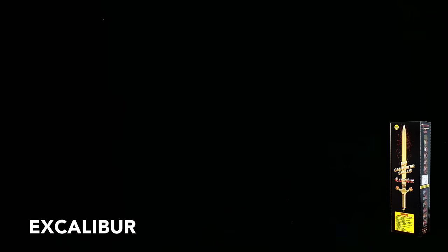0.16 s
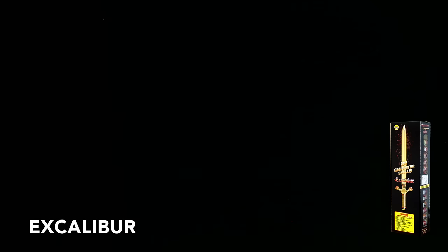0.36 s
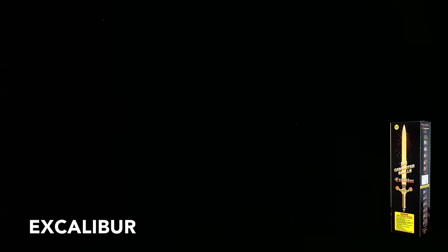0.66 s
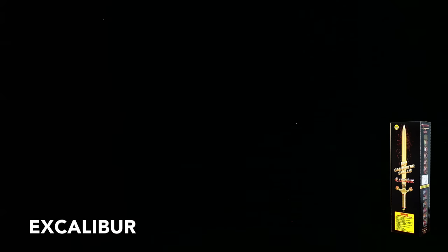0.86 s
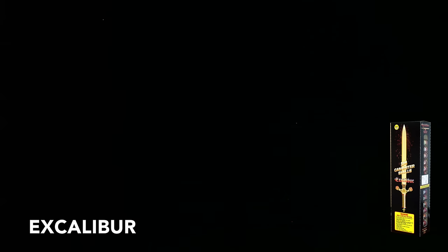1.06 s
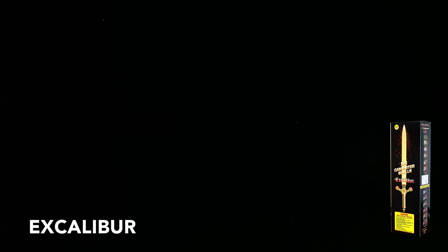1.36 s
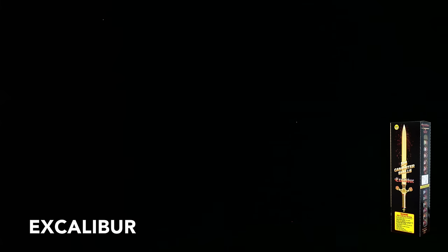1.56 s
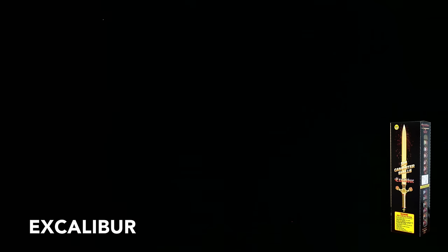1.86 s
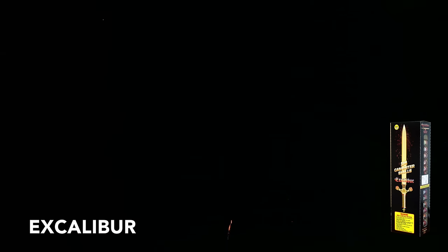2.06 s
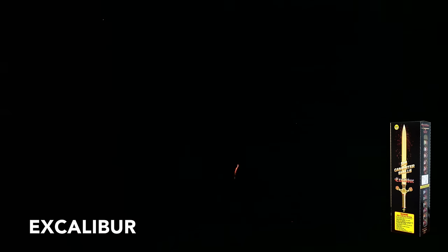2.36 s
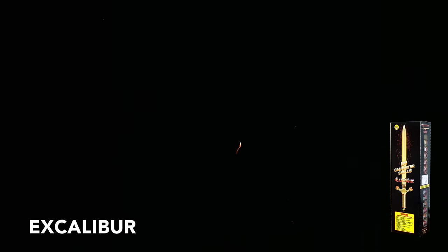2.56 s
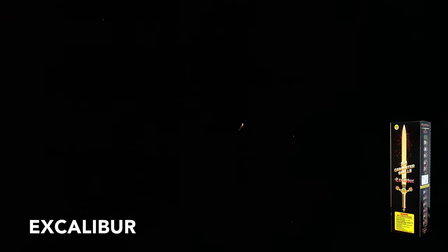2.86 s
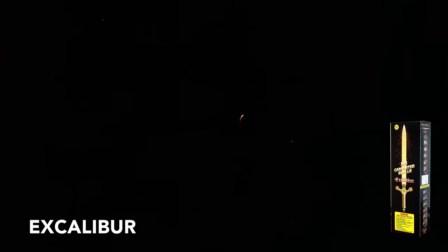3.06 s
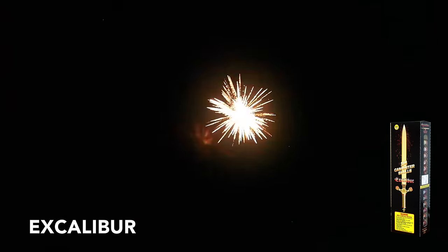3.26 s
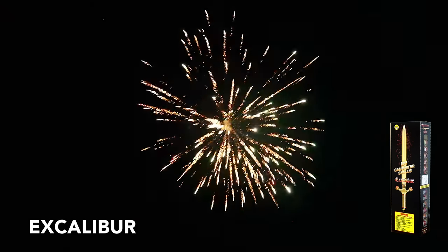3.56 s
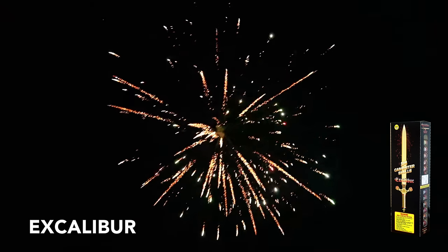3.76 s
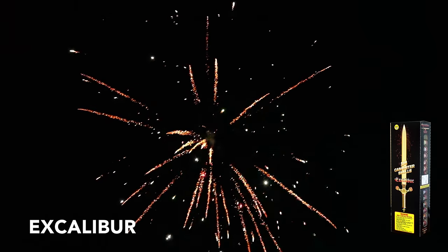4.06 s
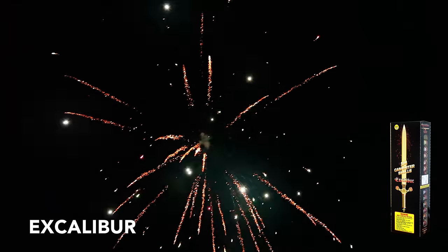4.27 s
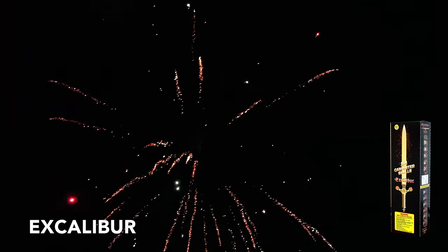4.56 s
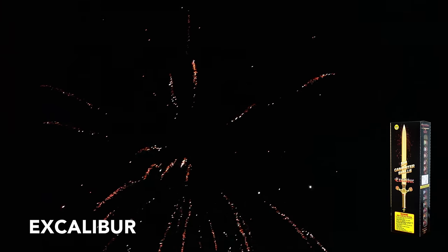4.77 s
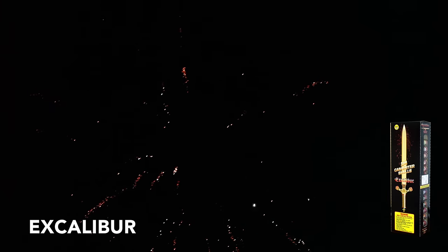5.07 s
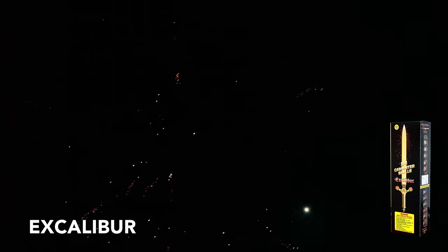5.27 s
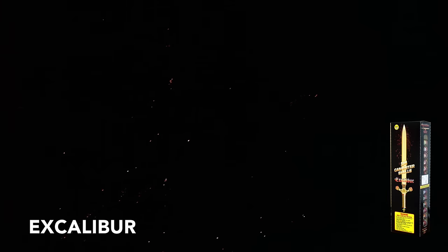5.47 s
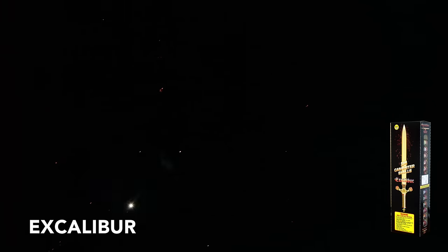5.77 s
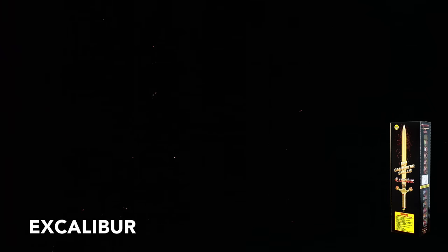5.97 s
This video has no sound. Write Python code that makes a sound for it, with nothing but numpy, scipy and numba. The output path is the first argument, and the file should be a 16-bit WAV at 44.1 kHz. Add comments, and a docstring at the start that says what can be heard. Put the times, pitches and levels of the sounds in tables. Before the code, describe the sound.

Quiet open country at night: soft air, microphone hiss, a barely audible low tone and light wind flutter, with a tiny thin tick at 0.2 seconds. At about 1.54 a firework leaves its tube with a sharp tearing crack and a flattened low thump, overloading the small stereo camera. Bright echoes and quick slaps scatter left and right, rolling away until about 2.6. From 2.3 to 3.4 the climbing shell gives faint soft puffs of hiss, while low wind buffeting swells strongly around 2.8 to 3.2. At 3.45 the shell bursts with a massive, distorted bang, low and abrupt. Dense echoes roll back, mostly from the right, with strong slaps near 3.8 and 4.5; treble fades first, leaving a dull, diminishing rumble. The background ducks, then hiss slowly returns. Wind thuds again around 5.3 to 5.5, and faint late slaps come near 6.0.

```python
"""Firework shell over open country at night

A shell leaves its tube with a noise crack and a flattened low thump, climbs in puffs of hiss, and bursts overhead
as a pressure spike, low ringing and a flash of noise. Decaying noise and short slaps roll back from trees and walls.
Wind kicks ring the cavities of a small stereo camera's two ports over night air, hiss and a faint tone.
Both blasts overload the camera; its gain control ducks and slowly lets the hiss return."""
import sys
import numpy as np
from scipy import signal
from scipy.fft import rfft, irfft, next_fast_len
from scipy.io import wavfile
from scipy.ndimage import uniform_filter1d, map_coordinates
from numba import njit

SR = 44100
rng = np.random.default_rng(int(sys.argv[2]) if len(sys.argv) > 2 else 0)


def to_wav(sig):
    """Store sig (one row per channel, or 1-D mono) as 16-bit WAV at the path in sys.argv[1].

    Samples outside -1..1 are clipped; the rate is SR.
    """
    pcm = np.clip(np.atleast_2d(sig), -1, 1) * 32767
    pcm = np.round(pcm).astype(np.int16)
    wavfile.write(sys.argv[1], SR, pcm.T)  # frames by channels


N = 270333
T = np.arange(N) / SR  # s
LAUNCH_S, THUMP_S, BURST_S = 1.542, 1.549, 3.4529

# Spectra give relative density; rush() sets the noise to rms 1 before a source sets its level.
# far night air and microphone hiss: (f/Hz, level/dB per Hz)
NIGHT_SPECTRUM = [(18, -25), (30, -11), (60, -8.5), (200, -14.5), (330, -12), (473, -16), (684, -16),
                  (1160, -17), (1500, -18), (1810, -19.5), (3770, -21), (13700, -22.5), (16000, -20)]
# left-right likeness of the night: (f/Hz, correlation)
NIGHT_LIKENESS = [(100, 0.01), (700, 0.12), (1500, 0.087), (2500, 0.01)]
# faint steady tone and a partial near its octave: (f/Hz, level/dB)
HUM_PARTIALS = [(344.5, -58.5), (683.7, -65.5)]
# strength of the wind flutter, before its waver: (t/s, left level/dB, right level/dB)
WIND_LEVELS = [(0.0, -49, -47), (0.55, -63.5, -57), (0.95, -54.5, -53.5), (1.3, -64, -60),
               (1.5, -52.5, -46), (2.6, -42, -41.5), (2.66, -29.5, -24), (2.82, -21, -13.5),
               (2.94, -12.5, -18), (3.04, -19.5, -17.5), (3.14, -23.5, -22), (3.19, -33, -32),
               (3.25, -28, -26.5), (3.34, -39.5, -38), (3.45, -20.5, -34), (3.6, -56, -46),
               (4.4, -33, -35.5), (5.18, -46, -37), (5.28, -24, -24), (5.41, -22.5, -23.5),
               (5.5, -39.5, -50), (5.57, -34, -37), (5.64, -52, -37.5), (5.86, -33, -38.5),
               (5.98, -48, -40.5), (6.13, -36, -42)]
# single strong eddies, relative kicks: (t/s, left level/dB, right level/dB)
STRONG_EDDIES = [(0.341, -57, -42), (0.945, -63, -44), (1.214, -58, -45), (2.991, -31, -9.5),
                 (3.076, -24.5, -18.5), (3.12, -20.5, -33), (3.224, -26, -22), (3.41, -29, -19.5),
                 (5.303, -28, -15.5), (5.518, -25.5, -24), (5.855, -52, -26)]
# resonances of the left, then the right cavity: (f/Hz, width/Hz, relative level/dB)
PORT_CAVITIES = [
    [(128.2, 63, 20), (186, 49, 5.5), (250, 21, 2.5), (410, 110, 5), (570, 70, 7.5)],
    [(92.6, 16, 19.5), (163, 32, 2.5), (208, 31, 5.5), (405, 120, 3.5), (550, 64, 4)],
]
# thin tick: (f/Hz, level/dB per Hz)
TICK_SPECTRUM = [(2500, -18), (4500, -7), (6000, 0), (8500, -13), (11000, -40)]
# puffs of hiss while the shell climbs and tumbles: (t/s, level/dB)
CLIMB_PUFFS = [(2.28, -49), (2.45, -50), (2.6, -52.5), (2.721, -54), (2.8, -56.5), (2.9, -51.5), (3.0, -50),
               (3.12, -50.5), (3.249, -50), (3.33, -60), (3.404, -43.5)]
# colour of the puffs: (f/Hz, level/dB per Hz)
CLIMB_SPECTRUM = [(1200, -2.0), (1900, -5.0), (2700, 1.0), (3600, -7), (5500, -17.5), (8000, -20.5)]

# rolling echoes, rows boom, body, treble: (level before air loss 0.1 s after the blast/dB,
# spreading loss/dB per tenfold time, air loss/dB per s, first arrival/s, build-up/s)
LAUNCH_ROLL_LAYERS = [(-15, 21, 11, .018, 0.0037), (-20, 11, 12.5, 0.017, .004),
                      (-20, 17, 19.5, 0.012, .004)]
BURST_ROLL_LAYERS = [(-5.5, 17.3, 7.4, 0.017, 0.01), (-4, 11.17, 8.3, 0.049, 0.016),
                     (-8, 13, 14.86, 0.022, .004)]
# low boom of both rolls: (f/Hz, level/dB per Hz)
BOOM_SPECTRUM = [(40, -32.5), (80, -8), (130, -1), (190, 1.5), (280, -9), (450, -13.5), (700, -43)]
# body of the launch's early echoes: (f/Hz, level/dB per Hz)
LAUNCH_BODY_SPECTRUM = [(350, -52), (600, -10), (850, 0), (1100, 0), (1400, 0.5), (1650, -5.5), (2000, -7),
                        (3200, -50.5)]
# body of the burst's first echoes: (f/Hz, level/dB per Hz)
BURST_NEAR_SPECTRUM = [(300, -8), (480, -11.5), (800, -3.5), (1050, -3), (1450, 0), (1750, -10.5),
                       (2200, -12), (3200, -40)]
# body of the far echoes, also of the burst's slaps: (f/Hz, level/dB per Hz)
FAR_BODY_SPECTRUM = [(250, 0), (450, 1.5), (650, 7), (870, 9.5), (1150, -1.5), (1600, -6), (2300, -14.5),
                     (3600, -34)]
# treble of the launch's echo: (f/Hz, level/dB per Hz)
LAUNCH_TREBLE_SPECTRUM = [(1500, -42.5), (2300, 1.5), (3300, -2), (4200, -2), (5200, -4), (6800, -11.5),
                          (10000, -28), (16000, -45)]
# treble of the burst's echo: (f/Hz, level/dB per Hz)
BURST_TREBLE_SPECTRUM = [(1500, -11), (2200, 0.5), (3500, -2), (5000, -6), (7000, -16.5), (10000, -34.5),
                         (16000, -60)]
# highest treble of the burst's echo: (f/Hz, level/dB per Hz)
AIR_SPECTRUM = [(5000, -28), (7500, 0.5), (11000, -7), (16000, -15.5)]
# broad returns from rows of trees lift the roll's body and treble: (t/s, gain/dB, time from peak to 1/e of it/s)
TREE_SWELLS = [(1.674, 3.5, 0.016), (1.81, 3.5, 0.055), (3.654, 2, 0.058), (3.834, 2, 0.11),
               (4.483, 2, 0.13)]
# single slaps from nearer walls: (t/s, level/dB before its envelope, left minus right/dB)
WALL_SLAPS = [(1.643, -6, -6), (1.697, -9.5, 14), (1.774, -13.5, -16), (1.908, -18.5, -12),
              (1.963, -17, -5), (2.011, -18.5, 11), (2.219, -28.5, -10), (2.279, -29, 4), (2.434, -31.5, 7),
              (2.582, -36, -2), (3.775, -10, -14.5), (3.817, -3.5, -13), (4.461, -10.5, -14),
              (4.66, -28, -12), (4.77, -22, -10), (5.118, -22, -14), (5.202, -22, -12), (5.296, -28.5, -16),
              (5.905, -23.5, -3.5), (6.004, -21, -9.5), (6.013, -23, -9), (6.085, -27, -14)]
# low part of the burst's slaps: (f/Hz, level/dB per Hz)
SLAP_LOW_SPECTRUM = [(120, -5.0), (220, 0.5), (450, 2.5), (700, -35.5)]

# crack at the tube's mouth: (f/Hz, level/dB per Hz)
CRACK_SPECTRUM = [(400, -41.5), (900, -6.5), (1400, -6.5), (2160, 3), (2900, -3), (3700, -2.5),
                  (4700, -14.5), (6140, -17), (8000, -27.5), (16000, -39.5)]
# size of the tube's thump: (t after its start/s, level/dB)
THUMP_SIZE = [(0, 7), (.0045, 16), (.006, 9.5), (.011, 6), (.05, -41)]
# flash of the burst: (f/Hz, level/dB per Hz)
FLASH_SPECTRUM = [(300, 4.5), (800, 2), (2000, -5.5), (5000, -11), (16000, -29.5)]
# low ringing of the burst, centre values: (f/Hz, relative level/dB, time to fall 60 dB/s)
BURST_RING = [(208, -4.5, 0.045), (359.4, -7.5, 0.1), (753.5, -7.5, 0.065), (91, -0.5, 0.013)]


def amp(db):
    """dB to gain."""
    return 10 ** (np.asarray(db) / 20)


def unit(x):
    """x at rms 1."""
    return x / np.sqrt(np.mean(x ** 2) + 1e-20)


def along(points, hz):
    """Values of (Hz, value) points, joined on a log frequency axis."""
    f, v = np.transpose(points)
    return np.interp(np.log(hz + 1), np.log(f + 1), v)


def curves(rows):
    """One value per sample for each column after the time."""
    s, *cols = np.transpose(rows)
    return np.array([np.interp(T, s, c) for c in cols])


def wobble(rate):
    """A smooth random curve, rate knots a second."""
    knots = rng.standard_normal(int(N * rate / SR) + 4)
    return map_coordinates(knots, [np.arange(N) * rate / SR])


def pulse(start_s, rise_s, t60):
    """An envelope that rises quickly, then dies away by 60 dB every t60 seconds."""
    t = np.maximum(T - start_s, 0)
    return (1 - np.exp(-t / rise_s)) * amp(-60 * t / t60)


def filtered(x, response):
    """x times a complex response of frequency."""
    m = next_fast_len(N + SR // 2)
    return irfft(rfft(x, m) * response(np.fft.rfftfreq(m, 1 / SR)), m)[..., :N]


def colour(spectrum, hz):
    """Gain of a spectrum that falls away steeply beyond its ends."""
    low, high = spectrum[0][0], spectrum[-1][0]
    return amp(along(spectrum, hz)) * np.minimum(hz / low, 1) ** 4 / np.maximum(hz / high, 1) ** 4


def rush(spectrum, alike, patchy_db=None):
    """Coloured stereo noise of rms 1; patchy_db gives it time-frequency patches of random gain."""
    pair = rng.standard_normal((2, N + SR))
    if patchy_db:
        z = signal.stft(pair, nperseg=512)[2]
        field = rng.standard_normal(z.shape[1:])
        field = uniform_filter1d(uniform_filter1d(field, size=8, axis=0), size=4, axis=1)
        pair = signal.istft(z * amp(patchy_db * unit(field)), nperseg=512)[1]

    def mid_side(hz):
        # this angle gives the two sides the wished correlation
        angle = np.arccos(np.clip(along(alike, hz), -1, 1)) / 2
        return colour(spectrum, hz) * [np.cos(angle), np.sin(angle)]

    mid, side = filtered(pair[:, :N], mid_side)
    return unit(np.array([mid + side, mid - side]))


def balance(pan_db):
    """Left and right gains that differ by pan_db."""
    return amp(pan_db * np.array([[.5], [-.5]]))


def aside(x, count, pan_db):
    """A source off to one side: the left port lags by count samples and the levels differ."""
    return balance(pan_db) * np.array([np.roll(x[0], count), x[1]])


def night():
    """Steady night air and hiss as coloured noise, with a faint tone that reaches the left port 0.3 ms late."""
    lag_s = np.array([[.0003], [0]])
    hum = sum(amp(db) * np.sin(2 * np.pi * hz * (T - lag_s)) for hz, db in HUM_PARTIALS)
    return hum + amp(-50) * rush(NIGHT_SPECTRUM, NIGHT_LIKENESS)


def cavities(hz):
    """Each port's cavity resonates at its own pitches; a steep low-pass softens the kicks."""
    ports = []
    for port in PORT_CAVITIES:
        peaks = [amp(db) * (1j * hz * w / (c * c - hz * hz + 1j * hz * w)) ** 1.5 for c, w, db in port]
        ports.append(sum(peaks))
    return np.array(ports) / (1 + 1j * hz / 300) ** 4


def wind():
    """Eddies kick both ports about 45 times a second at unlike strengths and ring the cavities."""
    waver_db, wavers_per_s = 1.5, 9  # each port's own unevenness
    chance = rng.standard_normal((round(N / SR * 45), 3))
    at = (np.arange(len(chance)) + .15 * chance[:, 0]) * N / len(chance)
    at = np.clip(at.astype(int), 0, N - 1)
    kicks = 0.037 * rng.standard_normal((2, N))
    kicks[:, at] += amp(1.9 * chance[:, 1:].T)
    strong = np.zeros((2, N))
    for s, *db in STRONG_EDDIES:
        strong[:, round(s * SR)] = amp(db)
    waver = waver_db * np.array([wobble(wavers_per_s) for _ in range(2)])
    ringing = np.array([unit(port) for port in filtered(kicks, cavities)])
    flutter = amp(curves(WIND_LEVELS) + waver) * ringing
    return flutter + amp(43.5) * filtered(strong, cavities)


def tick():
    """One faint thin tick before the launch: a short pulse of treble noise."""
    return amp(-48.0) * pulse(0.21, 0.0023, 0.096) * rush(TICK_SPECTRUM, [(6000, .6)])


def climb():
    """The climbing shell: soft bell-shaped swells of hiss."""
    swell = sum(amp(db) * np.exp(-((T - s) / 0.063) ** 2) for s, db in CLIMB_PUFFS)
    return swell * rush(CLIMB_SPECTRUM, [(3000, 0.73)])


def fading(blast_s, db, spread_db, loss_db, first_s, build_s):
    """Gain of echoes whose path grows with time: they spread out and the air soaks them up."""
    t = T - blast_s
    swell = 1 - np.exp(-np.maximum(t - first_s, 0) / build_s)
    t = np.maximum(t, first_s)
    return swell * amp(db - spread_db * np.log10(10 * t) - loss_db * t)


def roll(blast_s, layers, near, far, treble_spectrum, dulling_s, alike, pan_db):
    """Echoes from ever farther away, mostly from the right; the treble fades first."""
    boom, middle, treble = (fading(blast_s, *layer) for layer in layers)
    lift = amp(sum(db * np.exp(-((T - s) / width_s) ** 2) for s, db, width_s in TREE_SWELLS))
    # the body crossfades from the near to the far colour
    near_share = np.exp(-np.maximum(T - blast_s, 0) / dulling_s)
    body = np.sqrt(near_share) * rush(near, [(800, alike)], patchy_db=3.0)
    body = body + np.sqrt(1 - near_share) * rush(far, [(800, alike)], patchy_db=2.0)
    low = boom * aside(rush(BOOM_SPECTRUM, [(100, 0.63)]), count=13, pan_db=-1.3)
    high = treble * aside(rush(treble_spectrum, [(3000, 0.35)]), count=4, pan_db=0.0)
    return low + lift * (middle * aside(body, count=4, pan_db=pan_db) + high)


def launch_roll():
    """The launch rolls back from the country around, its body dulling slowly."""
    return roll(LAUNCH_S, LAUNCH_ROLL_LAYERS, LAUNCH_BODY_SPECTRUM, FAR_BODY_SPECTRUM, LAUNCH_TREBLE_SPECTRUM,
                dulling_s=3.8, alike=0.16, pan_db=-3.0)


def burst_roll():
    """The burst rolls back, dulling sooner; air soaks up its highest treble soonest."""
    echoes = roll(BURST_S, BURST_ROLL_LAYERS, BURST_NEAR_SPECTRUM, FAR_BODY_SPECTRUM, BURST_TREBLE_SPECTRUM,
                  dulling_s=0.61, alike=0.41, pan_db=-4.5)
    highest = amp(-21) * pulse(BURST_S, .02, 0.76) * rush(AIR_SPECTRUM, [(8000, 0.036)])
    return echoes + highest


def slaps():
    """Short returns from nearer walls: noise pulses in echo colours, softer-edged the later they return."""
    smear_s_per_s = 0.0014
    out, t = np.zeros((2, N + SR)), np.arange(SR // 10) / SR
    early = rush(LAUNCH_BODY_SPECTRUM, [(800, 0.31)])
    early = early + 0.263 * rush(LAUNCH_TREBLE_SPECTRUM, [(800, 0.21)])
    late = rush(FAR_BODY_SPECTRUM, [(800, 0.19)])
    late = late + 0.71 * rush(SLAP_LOW_SPECTRUM, [(800, 0.77)])
    for s, db, pan_db in WALL_SLAPS:
        blast_s, source = (LAUNCH_S, early) if s < BURST_S else (BURST_S, late)
        edge_s = 0.0009 + smear_s_per_s * (s - blast_s)
        shape = (1 - np.exp(-(t / edge_s) ** 2)) * amp(-60 * t / (0.02 + 8 * edge_s))
        start = rng.integers(N - len(t))
        noise = source[:, start:start + len(t)]
        at = round(s * SR)
        out[:, at:at + len(t)] += amp(db) * balance(pan_db) * shape * noise
    return out[:, :N]


def crack():
    """The lift charge burns out of the tube as tearing noise; a weaker second puff follows."""
    rise_db_per_s, hold_s, fall_db_per_s, lift_db = 5500, .0058, 5999.5, 9
    after_s, after_wide_s, after_db = 0.017, 0.0065, -3
    t = T - LAUNCH_S
    burn = amp(lift_db + rise_db_per_s * np.minimum(t, 0) - fall_db_per_s * np.maximum(t - hold_s, 0))
    after = amp(after_db) * np.exp(-((t - after_s) / after_wide_s) ** 2)
    return (burn + after) * rush(CRACK_SPECTRUM, [(1000, 0.32), (3000, 0.2), (9000, 0.033)])


def thump():
    """The tube's low thump: a sine whose first swings are driven square, then round off."""
    flattening, rounds_off_s = 6.5, .004
    t = np.maximum(T - THUMP_S, 0)
    # the pitch sinks from 200 to about 116 Hz in 15 ms, then jumps up to a steady 158 Hz
    swing = -np.sin(2 * np.pi * 200 * t * (1 - 14 * np.minimum(t, .015)))
    size_db = np.interp(t, *np.transpose(THUMP_SIZE), right=-200)
    drive = 1 + flattening * np.exp(-(t / rounds_off_s) ** 2)
    return amp(size_db) * np.tanh(drive * swing)


def burst():
    """The shell breaks: a pressure spike, heavy low ringing and a broad flash of noise."""
    spike_s = .0004
    t = np.maximum(T - BURST_S, 0)
    spike = (t > 0) * (t < spike_s) * amp(10.0)
    late = np.maximum(t - spike_s, 0)
    ring = np.zeros((2, N))
    for port in ring:
        for hz, db, t60 in BURST_RING:
            # each port hears slightly different levels and pitches
            size = amp(db + rng.normal(0, 1) - 60 * late / t60)
            port -= size * np.sin(2 * np.pi * hz * rng.normal(1, 0.0094) * late)
    flash = pulse(BURST_S, 0.01, 0.11) * rush(FLASH_SPECTRUM, [(500, 0.66), (3000, 0.085)])
    return spike + amp(21.0) * ring + amp(18.0) * flash


def scene():
    """Everything that reaches the two ports."""
    background = night() + wind() + tick()
    echoes = launch_roll() + burst_roll() + slaps()
    return background + climb() + echoes + crack() + thump() + burst()


@njit
def follow(needed, fall, hold, rise):
    """Gain in dB: sinks fast to the deepest need, holds it, then creeps back."""
    out, gain, aim, left = np.zeros(len(needed)), 0., 0., 0
    for i in range(len(needed)):
        if needed[i] <= aim or left <= 0:
            left = hold if needed[i] < min(aim, gain) else left
            aim = needed[i]
        left -= 1
        gain += (aim - gain) * (fall if aim < gain else rise)
        out[i] = gain
    return out


def record(dry):
    """Gain control listens to the treble; it is too slow for the blasts, which clip."""
    fall_s, hold_s, rise_s = 0.0054, .44, 1.01
    ceiling, top_hz = 1.04, 15800
    dry = signal.sosfilt(signal.butter(2, 38, "high", fs=SR, output="sos"), dry)
    treble = signal.sosfilt(signal.butter(4, 1200, "high", fs=SR, output="sos"), dry)
    power = signal.lfilter(np.ones(400) / 400, 1, np.mean(treble ** 2, axis=0))  # 9 ms average
    # each dB of treble above -9 dB asks for 1.5 dB less gain
    needed_db = 1.5 * np.minimum(-9 - 10 * np.log10(power + 1e-12), 0)
    gain_db = follow(needed_db, 1 / (fall_s * SR), int(hold_s * SR), 1 / (rise_s * SR))
    loud = dry * amp(gain_db)
    clipped = loud / (1 + np.abs(loud / ceiling) ** 5) ** (1 / 5)
    return np.clip(filtered(clipped, lambda hz: hz < top_hz), -1, 1)


dry = scene()
out = record(dry)
to_wav(out)
```